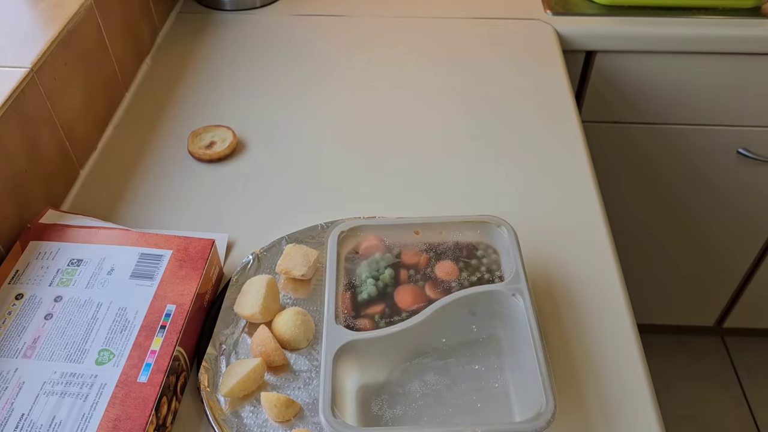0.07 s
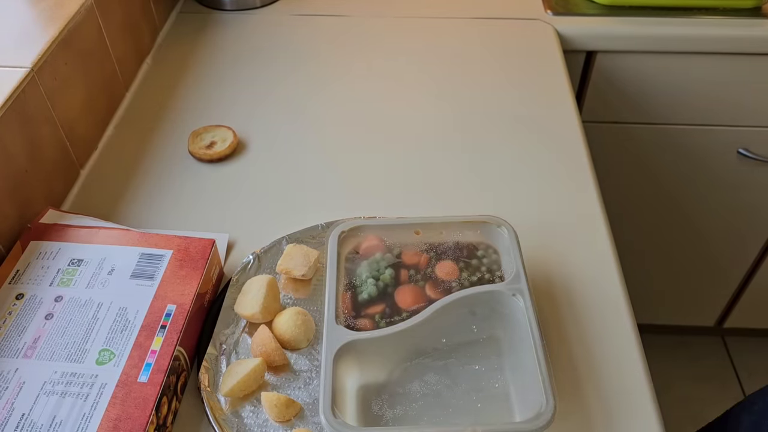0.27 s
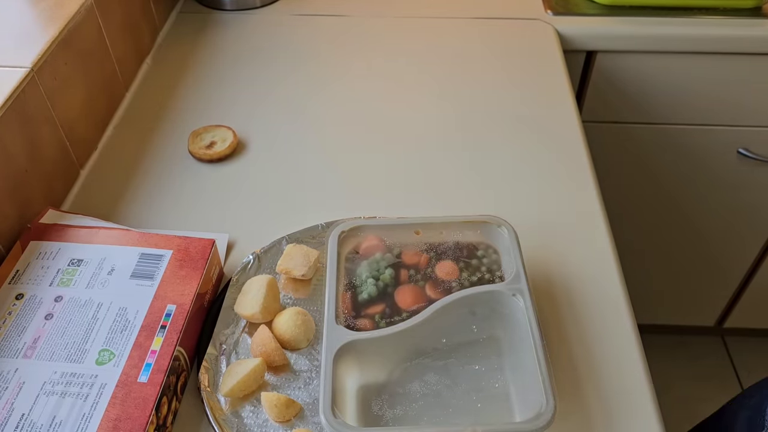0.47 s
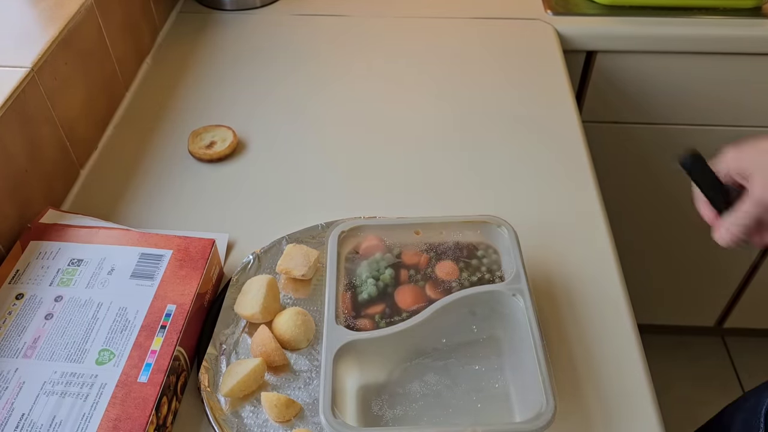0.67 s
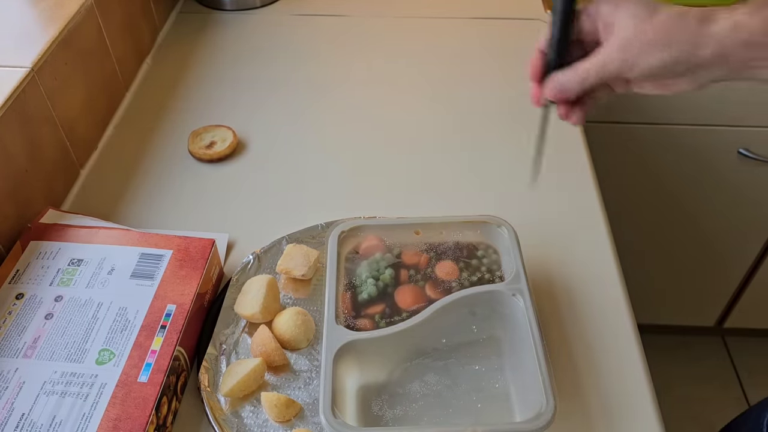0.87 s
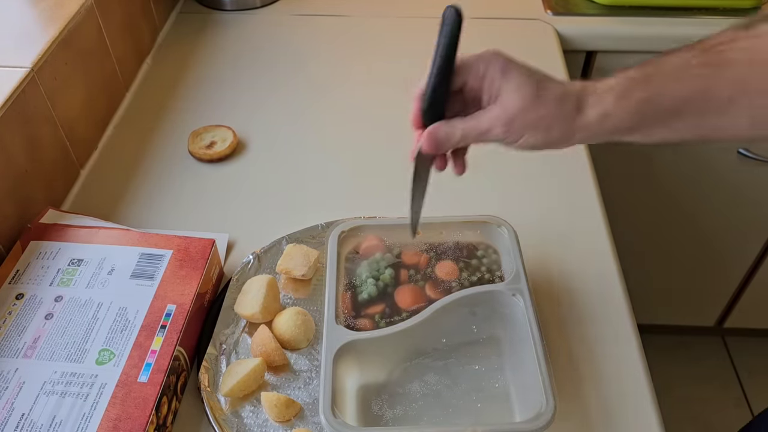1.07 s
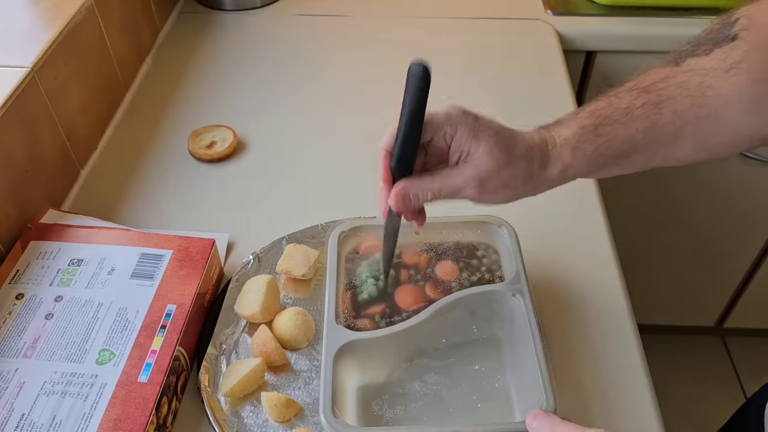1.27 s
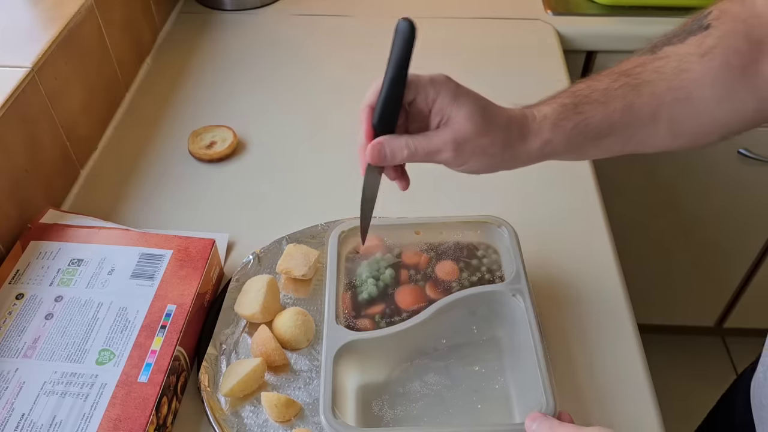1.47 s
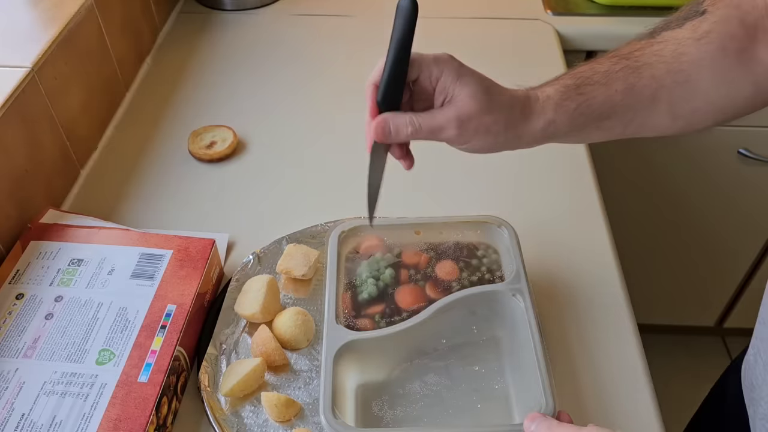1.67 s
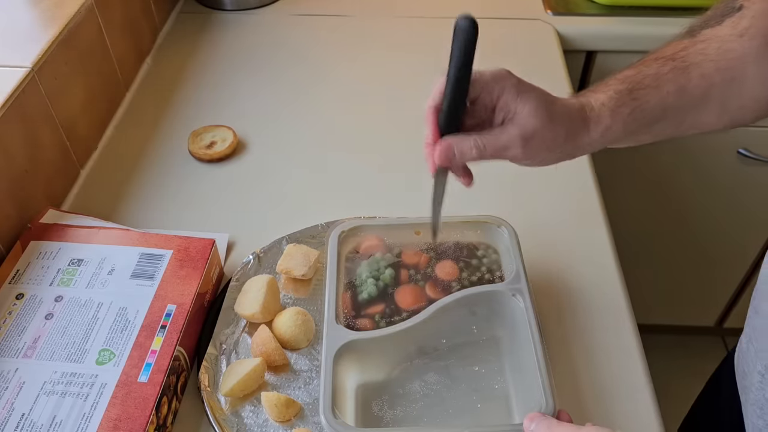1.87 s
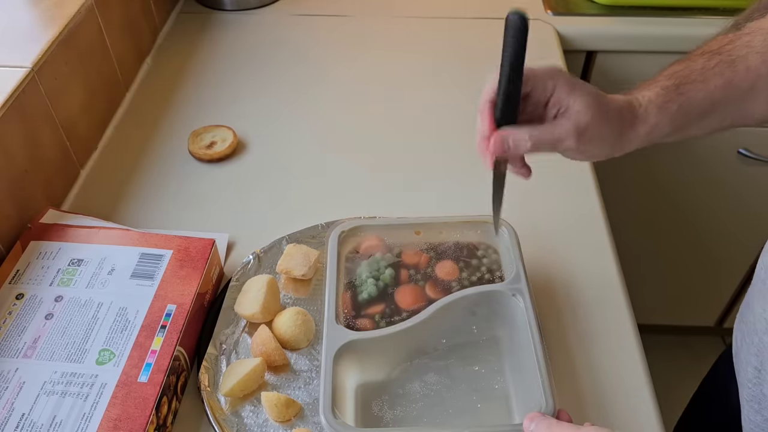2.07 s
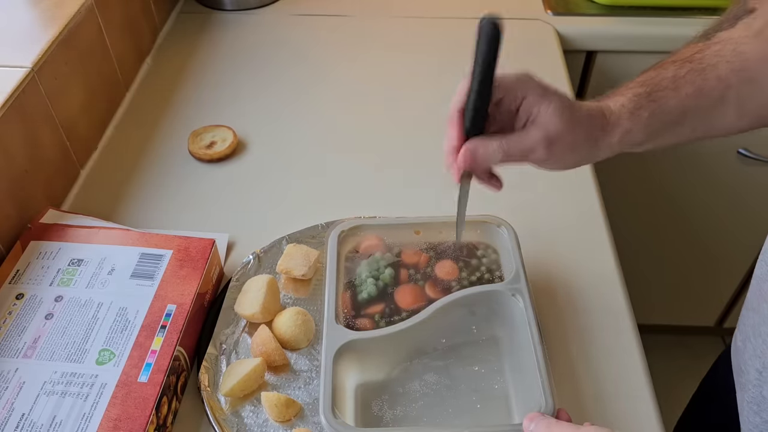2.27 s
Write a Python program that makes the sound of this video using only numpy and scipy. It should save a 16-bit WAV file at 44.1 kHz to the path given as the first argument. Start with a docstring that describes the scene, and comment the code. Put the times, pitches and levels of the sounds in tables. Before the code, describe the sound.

Six quick, crisp pops as a blade punctures the tight film on a food tray

```python
"""A kitchen knife stabs six times through the taut film lid of a food tray on a worktop.
Each stab is a low press and lead-in noise, a filtered snap with fluttering noise, and decaying sines for the
knock and ring of the tray; dense decaying noise is the hard-walled kitchen ringing on.
Smaller, duller snaps are the ticking blade, and soft low sines sway around some stabs.
Behind lie coloured noise for room air, an arm's rustle from before the first stab, and a faint appliance hum."""
import sys
import numpy as np
from scipy import signal
from scipy.fft import rfft, irfft
from scipy.io import wavfile
from scipy.ndimage import uniform_filter1d

SR = 44100
rng = np.random.default_rng(int(sys.argv[2]) if len(sys.argv) > 2 else 0)


def pcm_store(signal):
    """Save signal as 16-bit PCM."""
    levels = np.round(np.clip(np.atleast_2d(signal), -1, 1) * 32767)
    wavfile.write(sys.argv[1], SR, levels.astype(np.int16).T)


N = 102356  # length in samples

# Colour of the pop in the room. Each row: frequency in Hz, relative density in dB per Hz.
POP = [(30, -36), (80, -14), (130, 0.5), (230, -2.5), (330, -2.5), (650, 0.5), (1200, 3.5), (2200, -1),
       (3500, -1), (5500, -3.5), (8800, -5), (10500, -12), (11600, -6), (12600, -7), (15600, -6.5)]
TAIL_DB = 16  # base level of the kitchen's answer to stabs and ticks


def amp(db):
    """Decibels to gain."""
    return 10 ** (np.asarray(db) / 20)


def unit(x):
    """Scales to rms 1."""
    return x / np.sqrt(np.mean(x ** 2) + 1e-20)


def read(points, hz):
    """Reads a table on a log-frequency axis."""
    f, value = np.transpose(points)
    return np.interp(np.log(hz + 1), np.log(f), value)


def bump(f, hz, octaves):
    """A bell of height 1 on a log-frequency axis."""
    return np.exp(-(np.log2((f + 1) / hz) / octaves) ** 2)


def slope(f):
    """Octaves climbed above 100 Hz, flattening out below it."""
    return np.log2(1 + f / 100)


def pan(db):
    """Left and right gains for a level difference, positive to the left."""
    return amp(np.array([[db], [-db]]) / 2)


def add(mix, s, sound):
    """Mixes a stereo sound in at a time in seconds."""
    part = mix[:, round(s * SR):][:, :sound.shape[1]]
    part += sound[:, :part.shape[1]]


def colour(x, curve, size=4096):
    """Causal minimum-phase filter of unit energy from a function giving dB at each frequency."""
    hz = np.abs(np.fft.fftfreq(size, 1 / SR))
    log_gain = np.log(amp(curve(hz)))
    spectrum = np.exp(np.conj(signal.hilbert(log_gain)))
    taps = np.fft.ifft(spectrum).real[:size // 2]
    taps = taps / np.linalg.norm(taps)
    return signal.fftconvolve(x, taps[None], axes=1)[:, :x.shape[1]]


def paired(x):
    """Makes two unrelated channels alike in the bass, as at two close microphones."""
    # Each row: frequency in Hz, left-right likeness from 0 to 1.
    likeness = [(30, 0.41), (150, 0.99), (350, 0.78), (700, 0.055), (2000, 0.054), (16000, 0.094)]
    size = x.shape[1]
    a, b = rfft(x)
    c = read(likeness, np.fft.rfftfreq(size, 1 / SR))
    shared = np.sqrt((1 + c) / 2) * a
    opposed = np.sqrt((1 - c) / 2) * b
    return irfft(np.array([shared + opposed, shared - opposed]), size)


def noise(spectrum, size):
    """Stereo noise of a given colour at rms 1."""
    hiss = paired(rng.standard_normal((2, size)))
    return unit(colour(hiss, lambda f: read(spectrum, f)))


def room_air(level_db=-65.5):
    """Room air: steady coloured noise."""
    # Each row: frequency in Hz, relative density in dB per Hz.
    air_colour = [(20, -6.5), (45, -5.5), (100, -3.5), (180, -6), (240, -10), (450, -14.5), (700, -15.5),
                  (1050, -22.5), (3000, -27.5), (5000, -24.5), (5900, -32), (7100, -24), (8700, -37.5),
                  (10500, -41), (12000, -30), (16000, -28.5)]
    return amp(level_db) * noise(air_colour, N)


def appliance_hum():
    """An appliance's hum: steady sines whose phases waver slowly and independently."""
    # Partials of the hum. Each row: frequency in Hz, rms level in dB.
    partials = [(100.5, -70.5), (172, -76), (300.7, -68.5), (500.6, -79), (601.5, -86.5), (702, -85.5)]
    t = np.arange(N) / SR
    out = np.zeros(N)
    for hz, db in partials:
        waver = unit(uniform_filter1d(rng.standard_normal(N), size=9000))
        phase = 2 * np.pi * (hz * t + rng.random()) + 0.33 * waver
        out += amp(db) * np.sqrt(2) * np.sin(phase)
    return out


def arm_rustles():
    """The arm reaches in: sleeve noise swells and fades."""
    # Each row: start in seconds, length in seconds, level in dB.
    rustles = [(0.427, 0.19, -72.5), (.785, 0.17, -61.5), (1.0, 0.41, -72)]
    # Colour of the sleeve. Each row: frequency in Hz, relative density in dB per Hz.
    sleeve = [(100, -11.5), (500, 19.5), (1000, 4), (2200, 9), (4500, 5.5), (8000, 3.5), (11000, -13),
              (16000, -20.5)]
    out = np.zeros((2, N))
    for s, length, db in rustles:
        u = np.linspace(0, 1, round(length * SR))
        swell = np.sin(np.pi * u ** 0.66)
        add(out, s, amp(db) * swell * noise(sleeve, len(u)))
    return out


def background():
    """Air, hum and rustle together, leaning slightly right."""
    return (room_air() + appliance_hum() + arm_rustles()) * pan(-0.99)


def sways(sway_hz=45):
    """A deep, soft sine wobble swells and fades around some stabs."""
    # Each row: start in seconds, length in seconds, level in dB.
    wobbles = [(1.308, .20, -42), (1.496, 0.17, -45), (2.095, 0.14, -41)]
    out = np.zeros((2, N))
    for s, length, db in wobbles:
        t = np.arange(0, length, 1 / SR)
        swell = np.sin(np.pi * (t / length) ** 0.63)
        add(out, s, amp(db) * swell * np.sin(2 * np.pi * sway_hz * t) * pan(-1.4))
    return out


def kitchen(build_s=0.0019, lumpy=0.37, size=32768):
    """Dense reflections that build up fast, each band dying at its own speed."""
    # Decay of the hard-walled room. Each row: frequency in Hz, time to fall by 60 dB in seconds.
    decay = [(60, 0.41), (150, 0.55), (400, 0.44), (1040, 0.4), (2760, 0.45), (7280, 0.42), (15000, 0.29)]
    t = np.arange(size) / SR
    taps = rng.standard_normal((2, size)) * np.exp(lumpy * rng.standard_normal((2, size)))
    hz, at, z = signal.stft(paired(taps), SR, nperseg=256)
    dying = z * amp(-60 * at / read(decay, hz)[:, None])
    tail = signal.istft(dying, SR)[1][:, :size]
    return unit(tail * (1 - np.exp(-t / build_s))) / np.sqrt(size)


def crack(size=4096):
    """The film splits: a pressure snap, a brief flutter of the torn edges, and echoes off the worktop."""
    # Colour of the direct crack. Each row: frequency in Hz, relative density in dB per Hz.
    crack_colour = [(40, -8), (200, 2.5), (600, 1), (1500, 3), (4000, 3), (7000, 7), (10500, -4.5),
                    (13000, -2), (16000, 2.5)]
    snap_db, snap_s, right_lag_s = 0, 0.00006, 0.00005
    flutter_db, flutter_s, early_db, early_s = -1, 0.00044, -17, 0.0082
    t = np.arange(size) / SR
    u = np.maximum(t - np.array([[0], [right_lag_s]]), 0) / snap_s
    snap = amp(snap_db) * u * (2 - u) * np.exp(-u) * np.e  # swings up, then below zero
    flutter = amp(flutter_db) * np.exp(-t / flutter_s)
    echoes = amp(early_db) * np.exp(-t / early_s)
    onset = np.minimum(u / 2, 1)
    scatter = (flutter + echoes) * onset * paired(rng.standard_normal((2, size)))
    return colour(snap + scatter, lambda f: read(crack_colour, f))


def ticks(crack_db=-4, crack_tilt=-1.2, room_tilt=-1.4):
    """Smaller, duller snaps of the knife, in the hand and then catching in the slit; tilts in dB per octave."""
    # Each row: time in seconds, relative snap level in dB, relative room level in dB.
    catches = [(.967, -48, -48), (1.3095, -16, -16.5), (1.3157, -12, -11.5), (1.3704, -5.5, -13),
               (1.5340, -15, -12.5), (1.9660, -14.5, -22)]
    out = np.zeros((2, N))
    for s, db, room_db in catches:
        snap = colour(crack(), lambda f: crack_tilt * slope(f))
        add(out, s, amp(db + crack_db) * snap)
        tail = colour(kitchen(), lambda f: read(POP, f) + room_tilt * slope(f))
        add(out, s, amp(TAIL_DB + room_db) * tail)
    return out


def press(level_db=-29, press_s=0.005, press_hz=148, size=2048):
    """The tip pushes the film down for a few milliseconds before it gives way: a growing low sine."""
    before = np.arange(size)[::-1] / SR
    push = np.exp(-before / press_s) * np.sin(-2 * np.pi * press_hz * before)
    return amp(level_db) * push * pan(-13)


def lead_in_noise(level_db=-29.5, swell_s=0.0085, grain=1.0, size=1400):
    """A short grainy noise swells into each burst."""
    before = np.arange(size)[::-1] / SR
    grains = np.exp(grain * rng.standard_normal(size))
    grainy = unit(noise(POP, size) * grains)
    return amp(level_db) * np.exp(-before / swell_s) * grainy * pan(3.2)


def torn(x, tear_s=0.0032, tear_share=0.42, size=512):
    """The slit opens in a quick random run of snaps, which gives each pop its own uneven colour."""
    run = rng.standard_normal(size) * np.exp(-np.arange(size) / SR / tear_s)
    run *= tear_share / np.linalg.norm(run)
    run[0] = 1  # the first, strongest snap
    return signal.lfilter(run / np.linalg.norm(run), 1, x)


def ring(modes, spread, uneven_db, size=24000):
    """Dying modes; each blow varies their levels, pitches and left and right phases (spread in radians)."""
    t = np.arange(size) / SR
    out = np.zeros((2, size))
    for hz, db, t60 in modes:
        v = rng.standard_normal(4)
        level = amp(db + uneven_db * v[0] - 60 * t / t60)
        pitch = hz * (1 + 0.0017 * v[1])
        out += level * np.sin(2 * np.pi * pitch * t + spread * v[2:, None])
    return out


def thump(level_db=-23.5, low_hz=106.5):
    """The tray knocks on the worktop in a few low modes; it is too small to push deep bass."""
    # Each row: frequency in Hz, relative level in dB, time to fall by 60 dB in seconds.
    blow = [(128, -7, 0.23), (184, 1, 0.047), (226.4, 2, 0.071), (413.5, -7.5, 0.085)]
    high_pass = signal.butter(3, low_hz, "high", fs=SR, output="sos")
    knock = signal.sosfilt(high_pass, ring(blow, spread=0.4, uneven_db=1))
    return -amp(level_db) * knock * pan(-4)


def tray_ring(level_db=-33):
    """The struck tray and worktop ring in many modes."""
    # Each row: frequency in Hz, relative level in dB, time to fall by 60 dB in seconds.
    tray_modes = [(139, -12, 0.18), (228.9, -4, 0.55), (376.7, -5, 0.31), (564, -12, 0.39),
                  (624, -7.5, 0.38), (764, -1, 0.25), (986, -11, 0.17), (1120, 3, 0.31), (1163, 2.5, 0.2),
                  (1376, 0, 0.42), (1614, -10, 0.34), (1680, -7, 0.54), (1815, -2, 0.36), (1930, -4, 0.47),
                  (2106, -8, 0.62), (3135, -6.5, 0.36), (3580, 1.5, 0.21)]
    return amp(level_db) * ring(tray_modes, spread=0.72, uneven_db=2.5)


def stabs(film_octaves=0.17, crack_tilt=1.23, same_path=0.61):
    """Press, lead-in noise, crack, thump, tray ring and room; all stabs share part of their echoes."""
    # Each row: burst time in seconds, then relative levels in dB of crack, room, thump, press, lead-in noise
    # and tray ring, brightness in dB per octave, hollow of the tray in dB, lower film resonance in Hz, its dB,
    # upper film resonance in Hz, its dB. The crack takes the colour columns times crack_tilt.
    blows = [(1.2804, -2, 1, 0, -23, 0.5, 0, 0, -6.5, 2910, 4.5, 7400, -1),
             (1.5058, -3.5, 0.5, 2, 4.5, 4.5, -0.5, -.5, 0.5, 1620, 0.5, 8240, 1.5),
             (1.7146, -3, 1, 0, 7, 3, 1.5, -0.17, -4.5, 2170, 5, 7100, 0.5),
             (1.9007, 2.5, -7.5, -2.5, -6, -7, -0.5, -0.2, -2.5, 2000, 4, 4300, 2.5),
             (2.0872, 5, -2.5, -8, -9, -3.5, -5, 1.6, -3, 4970, 0.5, 8900, 2),
             (2.2962, 0.5, -1.5, 3, 4, -1.5, -2, -0.5, 0, 2040, 0.5, 7400, 1)]
    hollow_hz, hollow_octaves = 880, 0.63
    out = np.zeros((2, N))
    echoes = kitchen()
    for (s, crack_db, room_db, thump_db, press_db, lead_in_db, tray_db,
         tilt, hollow_db, low_hz, low_db, high_hz, high_db) in blows:
        def film(f):
            low = low_db * bump(f, low_hz, film_octaves)
            high = high_db * bump(f, high_hz, film_octaves)
            hollow = hollow_db * bump(f, hollow_hz, hollow_octaves)
            return low + high + hollow + tilt * slope(f)

        # press and lead-in noise end at the burst
        for lead in amp(press_db) * press(), amp(lead_in_db) * lead_in_noise():
            add(out, s - lead.shape[1] / SR, lead)
        add(out, s, amp(crack_db) * colour(crack(), lambda f: crack_tilt * film(f)))
        add(out, s, amp(thump_db) * thump())
        add(out, s, amp(tray_db) * tray_ring())
        tail = same_path * echoes + np.sqrt(1 - same_path ** 2) * kitchen()
        pop = torn(colour(tail, lambda f: read(POP, f) + film(f)))
        add(out, s, amp(TAIL_DB + room_db) * pop)
    return out


def scene():
    """The stabs in the quiet kitchen."""
    return background() + sways() + ticks() + stabs()


def record(dry, ceiling=0.66, cut_hz=15950):
    """Microphone colour, soft overload on the pops, band limit."""
    # The two microphones differ. Each row: frequency in Hz, left minus right in dB.
    ports = [(30, -2.5), (80, 0.5), (200, -1.5), (600, -1), (1300, 2.5), (2800, 0.5), (5500, 0), (9500, 4),
             (14000, -0.7)]
    left = colour(dry[:1], lambda f: read(ports, f) / 2)
    right = colour(dry[1:], lambda f: -read(ports, f) / 2)
    x = np.vstack([left, right]) * pan(1.2)
    x = x / (1 + (x / ceiling) ** 4) ** (1 / 4)
    low_pass = signal.firwin(401, cut_hz, window=("kaiser", 8), fs=SR)
    return signal.oaconvolve(x, low_pass[None], "same")


dry = scene()
out = record(dry)
pcm_store(out)
```